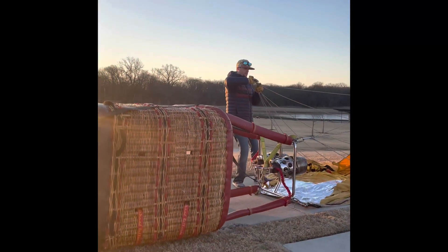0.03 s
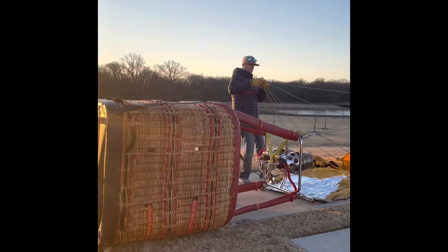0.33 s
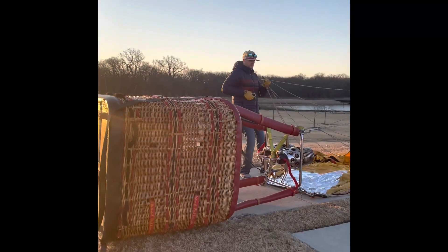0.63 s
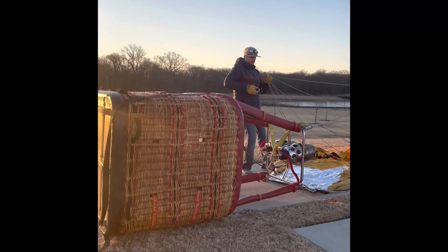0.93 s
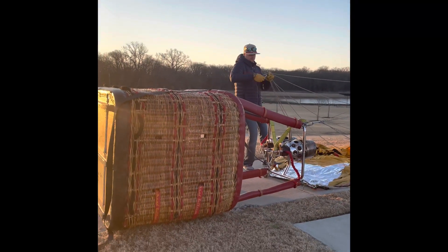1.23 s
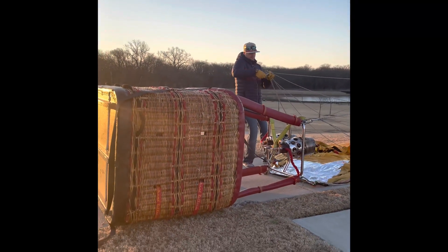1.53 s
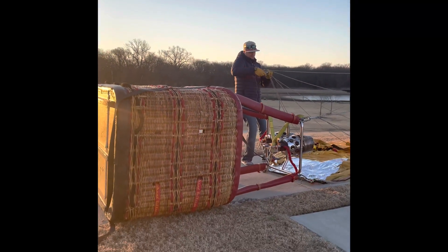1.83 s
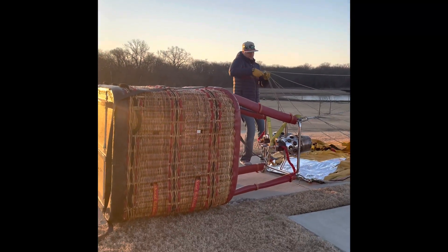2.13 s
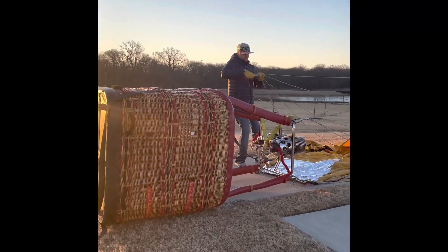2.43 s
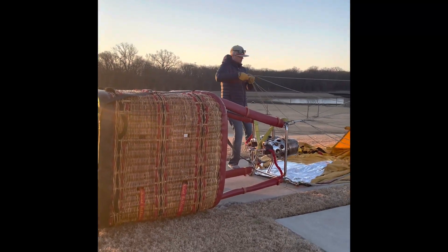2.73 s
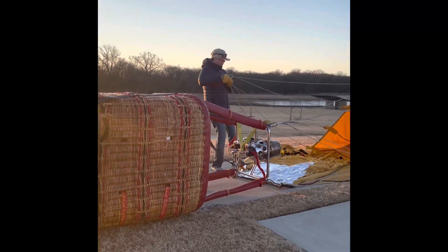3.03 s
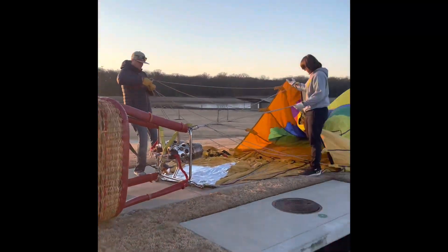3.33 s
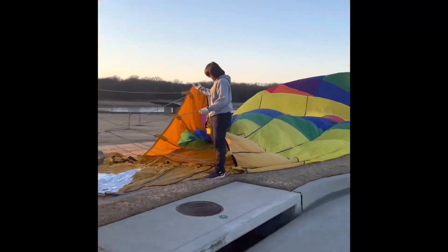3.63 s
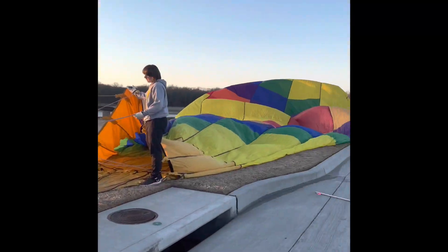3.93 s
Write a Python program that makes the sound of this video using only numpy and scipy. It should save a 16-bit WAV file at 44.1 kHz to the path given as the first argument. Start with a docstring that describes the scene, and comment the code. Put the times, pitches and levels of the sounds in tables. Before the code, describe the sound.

An engine-driven fan blows air into a hot-air balloon, roaring and humming as metal ticks.

```python
"""A broad roar of air and a steady hum, with a slow engine beat throbbing underneath.
It is a petrol fan blowing up a hot-air balloon that lies in an open field: the blades make the hum,
the churning air makes the roar, and the engine's firings ring the exhaust pipe.
Light metal parts tick and rattle with the shaking.
Near the end the microphone turns away and a bird chirps faintly."""
import sys
import numpy as np
from scipy import signal
from scipy.fft import rfft, irfft
from scipy.io import wavfile

SR = 44100
rng = np.random.default_rng(int(sys.argv[2]) if len(sys.argv) > 2 else 0)


def file_out(sig):
    """Save sig as 16-bit WAV at sys.argv[1]."""
    # one column per channel
    cols = np.atleast_2d(sig).T
    # limit, then scale
    lim = np.clip(cols, -1, 1)
    pcm = np.round(lim * 32767).astype(np.int16)
    wavfile.write(sys.argv[1], SR, pcm)


N = 176400

# The engine's slightly wavering speed. Each row: time in seconds, beats per second.
ENGINE_SPEED = [(0, 16.63), (.5, 16.755), (1.05, 16.785), (1.55, 16.69), (1.9, 16.61), (2.7, 16.665),
                (3.4, 16.675), (4, 16.51)]
# How the mix shifts as the microphone turns. Each row: time in seconds, roar gain in dB, lean of the
# midrange to the right (0-1), rattle gain in dB, engine gain in dB, gain of the ticks' ring in dB,
# how squarely it faces the open stream (0-1).
MIC_TURN = [(0, 0, 0.4, 1, 0, -13, 0), (1, 0.5, 0.36, 1, -0.8, 5, 0.7), (1.6, 0, 0.38, 0.5, -0.5, -4, 0),
            (2.4, 0.31, 0.3, 0, -0.8, 6.5, 0.04), (3.1, 0, 0.26, 0.5, 0.5, 4, 0.5),
            (3.55, -0.58, 0.17, -3, -1.5, -15, 1), (4, -1.5, 0, 1.5, 1, -8, 1)]
# The bright tone of the rattling metal. Each row: frequency in Hz, relative strength in dB.
METAL_TONE = [(3000, -38.5), (6200, -13), (7150, -9.5), (7800, -7), (8800, -36.5), (9600, -2.5),
              (10200, -1), (10750, -0.5), (11100, -3), (11350, 2), (11550, -7), (11800, -3), (12300, -19.5),
              (12900, -34)]


def undb(db):
    """Turn decibels into a factor to multiply by."""
    return 10 ** (np.asarray(db) / 20)


def level(x, db):
    """Scale a sound to an average (rms) level in dB."""
    return x * undb(db) / np.sqrt(np.mean(x ** 2))


def curve(table, column=1):
    """Join the points of a time table's column with straight lines, one value per sample."""
    rows = np.array(table)
    return np.interp(np.arange(N) / SR, rows[:, 0], rows[:, column])


def colour(x, points):
    """Shape a sound's tone with a filter drawn through (Hz, dB) points."""
    size = 2 * N
    hz, db = np.array(points).T
    gain = undb(np.interp(np.log(np.fft.rfftfreq(size, 1 / SR) + 1), np.log(hz), db))
    # Folding the cepstrum makes the filter ring only after a sound, never before it.
    cepstrum = irfft(np.log(gain))
    cepstrum[1:N] *= 2
    cepstrum[N + 1:] = 0
    return irfft(rfft(x, size) * np.exp(rfft(cepstrum)))[:N]


def band(x, low_hz, high_hz):
    """Gently keep the sound between two frequencies, without delaying it."""
    return signal.sosfiltfilt(signal.butter(1, [low_hz, high_hz], "band", fs=SR, output="sos"), x)


def noise(points):
    """Noise of rms 1 with its tone drawn through (Hz, dB) points."""
    return level(colour(rng.standard_normal(N), points), 0)


def wander(rate_hz):
    """A smooth random wiggle of rms 1, mostly slower than rate_hz."""
    smoothing = np.exp(-(np.fft.rfftfreq(N, 1 / SR) / rate_hz) ** 2)
    return level(irfft(rfft(rng.standard_normal(N)) * smoothing, N), 0)


def phase_of(hz):
    """The running angle, in radians, of a wave whose frequency changes."""
    return 2 * np.pi * np.cumsum(hz) / SR


def ringing(hz, fade_s):
    """The pure tone of struck metal, dropping 60 dB in fade_s seconds."""
    t = np.arange(N) / SR
    return np.sin(2 * np.pi * hz * t) * np.exp(-np.log(1000) * t / fade_s)


def glides(notes):
    """Short tones that swell, slide in pitch and fade."""
    t, out = np.arange(N) / SR, 0
    for start, length, from_hz, to_hz, db in notes:
        progress = np.clip((t - start) / length, 0, 1)
        hz = from_hz + (to_hz - from_hz) * progress
        out = out + undb(db) * np.sin(np.pi * progress) * np.sin(phase_of(hz))
    return out


def strikes(times, dbs):
    """One sharp kick for each time and level."""
    out, at = np.zeros(N), np.round(np.asarray(times) * SR).astype(int)
    inside = (at >= 0) & (at < N)
    np.add.at(out, at[inside], undb(dbs)[inside])
    return out


def engine_kicks(per_beat, start_s, jitter_s, scatter_db):
    """Kicks in step with the engine, each a little off in time and size."""
    beats = np.cumsum(curve(ENGINE_SPEED)) / SR
    due_beats = np.arange(0, beats[-1], 1 / per_beat)
    chance = rng.standard_normal((len(due_beats), 2))
    times = np.interp(due_beats, beats, np.arange(N) / SR)
    return strikes(start_s + times + jitter_s * chance[:, 0], scatter_db * chance[:, 1])


def mic_ports(x):
    """Make a left and right pair: the microphone's two openings hear the sound out of step."""
    # Each row: frequency in Hz, angle in radians by which the left side leads.
    left_lead = [(0, -4.5), (6200, 0.5), (7100, 1.28), (8000, 3), (9400, 3), (12200, 6.5)]
    hz, radians = np.array(left_lead).T
    half_shift = np.exp(.5j * np.interp(np.fft.rfftfreq(N, 1 / SR), hz, radians))
    return irfft(rfft(x) * np.array([half_shift, 1 / half_shift]), N)


def bird():
    """A bird whistles a few faint sliding notes, the same in both ears."""
    # Each row: start in seconds, length in seconds, first pitch in Hz, last pitch in Hz, level in dB.
    chirps = [(2.899, .09, 3080, 3290, -43), (3.13, 0.095, 3090, 2820, -38.5),
              (3.42, .11, 3510, 3210, -46.5), (3.49, .12, 3530, 3340, -53.5),
              (3.61, .09, 3495, 3290, -44.5)]
    return glides(chirps)


def clinks():
    """A small metal part clinks now and then."""
    # Each row: start in seconds, level in dB.
    taps = [(.44, -46), (.86, -46), (3.01, -41)]
    return signal.fftconvolve(strikes(*np.array(taps).T), ringing(hz=4600, fade_s=.24))[:N]


def click(start_s=.985, decay_s=.0015):
    """One light, dry click: a burst of noise that dies at once."""
    # Each row: frequency in Hz, relative strength in dB.
    click_tone = [(2500, -20), (5000, 2), (9000, -4), (13000, -2)]
    age = np.arange(N) / SR - start_s
    fade = (age > 0) * np.exp(-np.abs(age) / decay_s)
    return mic_ports(noise(click_tone) * fade * undb(-32))


def struck_metal(hits, decay_s):
    """Each hit starts a short burst of noise that rings the bright metal."""
    chatter = rng.standard_normal(N)
    fades = signal.lfilter([1], [1, -np.exp(-1 / (decay_s * SR))], hits)
    return colour(fades * chatter, METAL_TONE) / np.std(colour(chatter, METAL_TONE))


def rattle(shaft_hz=27.2, shaft_lag_s=.014):
    """Loose metal ticks over a fine sizzle, hardest when fan shaft and engine shake it together."""
    # The thin ring after a tick. Each row: pitch in Hz, seconds to fade by 60 dB, relative strength.
    ring_tones = [(10600, .03, 0.47), (11260, 0.17, 0.89), (11400, 0.083, .7), (11800, 0.043, 0.54)]
    # The sharper knocks. Each row: start in seconds, level in dB.
    hard_hits = [(.524, -34), (1.758, -26.5), (1.857, -30), (2.219, -38), (2.258, -31), (2.398, -32),
                 (2.438, -28.5), (2.917, -31), (3.102, -35)]
    t = np.arange(N) / SR
    engine_shake_db = 1.4 * np.cos(phase_of(curve(ENGINE_SPEED)))
    shaft_shake_db = 5 * np.cos(2 * np.pi * shaft_hz * (t - shaft_lag_s))
    hits = engine_kicks(per_beat=3, start_s=.0036, jitter_s=.0005, scatter_db=3.2)
    hits *= undb(engine_shake_db + shaft_shake_db)
    one_ring = sum(strength * ringing(hz, fade_s) for hz, fade_s, strength in ring_tones)
    ring = level(signal.fftconvolve(hits, one_ring)[:N], -50) * undb(curve(MIC_TURN, column=5))
    ticks = level(struck_metal(hits, decay_s=.017), -42)
    clacks = struck_metal(strikes(*np.array(hard_hits).T), decay_s=.0067)
    scattered = np.array([noise(METAL_TONE), noise(METAL_TONE)]) * undb(-54.5)
    sizzle = noise(METAL_TONE) * undb(-44)
    steady_rattle = (ticks + ring + sizzle) * undb(curve(MIC_TURN, column=3))
    return mic_ports(steady_rattle + clacks) + scattered


def rush():
    """The open stream adds a hollow rush whenever the microphone faces it."""
    # Each row: frequency in Hz, relative strength in dB.
    rush_tone = [(200, -22.5), (380, -6.5), (460, 3.5), (600, -12), (760, -1), (950, -17), (2500, -26),
                 (4000, -27.5), (6500, -30), (9000, -50)]
    return noise(rush_tone) * undb(-32.5) * curve(MIC_TURN, column=6)


def low_swells(pitch_drift=.06, drift_hz=7, swell_hz=8):
    """Low resonances in the roar swell briefly and slide in pitch."""
    # The ever-wandering tones. Each row: middle pitch in Hz, base level in dB.
    resonances = [(275, -36.5), (320, -36), (415, -37.5)]
    # The strongest swells. Each row: start and length in seconds, first and last pitch in Hz, level in dB.
    swells = [(.44, .14, 790, 756, -31), (1.32, 0.11, 415, 396, -30), (1.45, 0.1, 398, 374, -25),
              (1.7, 0.078, 400, 400, -27.5), (1.94, 0.11, 394.3, 378, -28.5), (2.27, 0.1, 370, 405, -27.5),
              (2.37, .12, 255, 313.5, -24.5), (2.43, 0.11, 399, 374, -27), (2.84, 0.11, 1170, 1157, -30.5),
              (3.4, 0.14, 780, 753, -29)]
    out = 0
    for hz, db in resonances:
        phase = phase_of(hz * (1 + pitch_drift * wander(drift_hz)))
        tone = wander(swell_hz) * np.sin(phase) + wander(swell_hz) * np.cos(phase)
        out = out + level(tone, db)
    return out * undb(curve(MIC_TURN)) + glides(swells)


def engine(low_cut_hz=47.6, hiss_lag_s=.0606, hiss_sharpness=2.25):
    """Pairs of uneven firings ring the exhaust; gas hisses once a beat and a deep throb comes twice."""
    # The two firings of a beat. Each row: delay in seconds, relative strength in dB.
    firing_pair = [(.0162, -2), (0.0299, -1)]
    # The pipe's resonances. Each row: pitch in Hz, width in Hz, strength (minus flips the wave).
    pipe_tones = [(86.8, 32.7, -0.84), (129, 13.8, 0.87), (162, 13.4, 0.27), (196, 29, 0.28)]
    # The tone of the gas hiss. Each row: frequency in Hz, relative strength in dB.
    hiss_tone = [(2000, -25), (3500, 2), (4900, -3.5), (5600, -1.5), (7100, 4), (8200, -7), (12000, -49)]
    firings = sum(engine_kicks(1, delay_s, jitter_s=.0003, scatter_db=.07) * undb(db)
                  for delay_s, db in firing_pair)
    pipe = sum(strength * signal.lfilter(*signal.iirpeak(hz, hz / width, fs=SR), firings)
               for hz, width, strength in pipe_tones)
    pipe = signal.lfilter(*signal.butter(2, low_cut_hz, "high", fs=SR), pipe)
    beat_hz = curve(ENGINE_SPEED)
    cycle = phase_of(beat_hz) - 2 * np.pi * hiss_lag_s * beat_hz
    hiss = noise(hiss_tone) * np.exp(hiss_sharpness * np.cos(cycle))
    throb = np.sin(2 * cycle)
    out = level(pipe, -25.5) + level(throb, -49) + mic_ports(level(hiss, -49.5))
    return out * undb(curve(MIC_TURN, column=4))


def fan(wobble_radians=.06, whine_drift=.002, whine_flutter_db=2):
    """The blades' hum flutters in the churning air they draw in; thin whines follow the same speed."""
    # Each row: time in seconds, hum pitch in Hz, gain of the lowest tone in dB, gain of the rest in dB.
    hum_course = [(0, 189.6, 0, -3), (.5, 190.8, 0, 0.5), (1, 191.7, -0.5, -1.5), (1.5, 191, -0.5, -1.5),
                  (1.8, 189.7, -1.5, 0), (2.25, 189.7, -3, 0), (2.5, 190.4, -2, 0.5),
                  (2.75, 190.4, 0, -0.5), (3.1, 190, -2.5, 0.5), (3.5, 189.8, -0.5, -3), (4, 188.7, -7, -2)]
    # Each row: multiple of the hum pitch, base level in dB, left minus right in dB, flutter in dB.
    blade_tones = [(1, -29, -1.5, 2.5), (2, -40.5, 5.5, 3), (3, -34.5, -2.5, 1.5), (4, -45, -9, 1.5),
                   (6, -41.5, -5.5, 3.5), (7, -48.5, -5, 3)]
    # The machinery's whines. Each row: average pitch in Hz, level in dB.
    whines = [(2595, -50.5), (4124, -59.5), (4570, -61.5), (5502, -59.5)]
    hum_hz = curve(hum_course)
    phase, out = phase_of(hum_hz), 0
    for multiple, db, pan_db, flutter_db in blade_tones:
        tone = np.sin(multiple * (phase + wobble_radians * wander(12)))
        tone *= undb(flutter_db * wander(15))
        swell_db = curve(hum_course, column=2 if multiple == 1 else 3)
        ears_db = np.array([[pan_db], [-pan_db]]) / 2
        out = out + level(tone, db) * undb(swell_db + ears_db)
    for whine_hz, db in whines:
        speed = hum_hz / hum_hz.mean() * (1 + whine_drift * wander(36))
        whine = np.sin(phase_of(whine_hz * speed)) * undb(whine_flutter_db * wander(12.3))
        out = out + level(whine, db)
    return out


def air_roar(gust_db=.93):
    """The churning stream roars; its midrange and a thin slice of treble lean to the right."""
    # The roar both ears share. Each row: frequency in Hz, relative strength in dB.
    shared_tone = [(20, -27), (40, -14), (65, -0.5), (120, -3.5), (235, -4), (275, -2.5), (400, -3),
                   (520, -6), (620, -2), (760, -4), (860, -5.5), (1200, -8), (1600, -11.5), (2000, -15.5),
                   (2600, -13), (3200, -22.5), (4200, -29), (4900, -39.5), (5500, -28), (7000, -33.5),
                   (8000, -52), (12600, -79)]
    # The part that differs between the ears, with the same columns.
    wide_tone = [(24, -13), (45, -9), (110, -4.5), (190, -14), (400, -1), (580, 1.5), (900, -13),
                 (1800, -49), (2400, -20), (2960, -9), (4240, -9), (5390, -16), (5930, -46.5), (7000, -22),
                 (9000, -12), (12500, -51)]
    middle = noise(shared_tone) * undb(-24.5 + gust_db * wander(27.6))
    lean = curve(MIC_TURN, column=2) * band(middle, 470, 1040) + band(middle, 3510, 3530)
    side = noise(wide_tone) * undb(-38) - lean
    return np.array([middle + side, middle - side]) * undb(curve(MIC_TURN))


def scene():
    """Engine, fan, air, rattle and bird in the open, with no echo."""
    return engine() + fan() + air_roar() + low_swells() + rush() + rattle() + click() + clinks() + bird()


def record(dry, top_hz=12700):
    """The phone cuts off the highest treble."""
    return signal.sosfilt(signal.ellip(8, .2, 70, top_hz, fs=SR, output="sos"), dry)


dry = scene()
out = record(dry)
file_out(out)
```